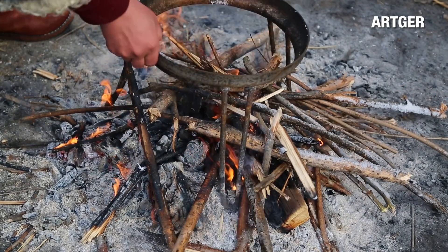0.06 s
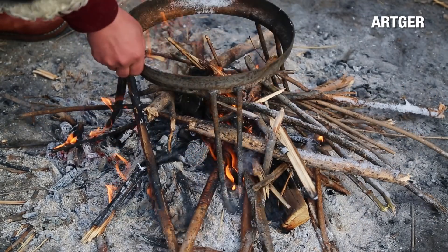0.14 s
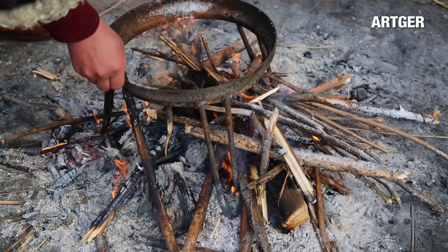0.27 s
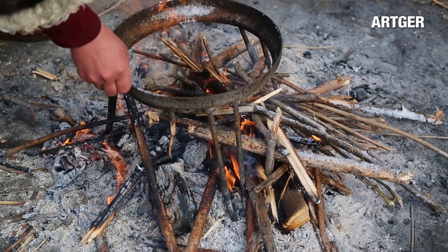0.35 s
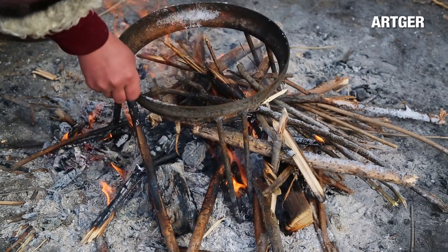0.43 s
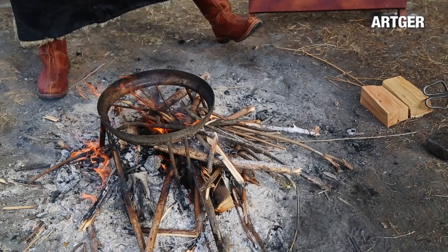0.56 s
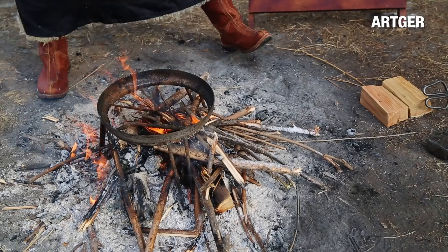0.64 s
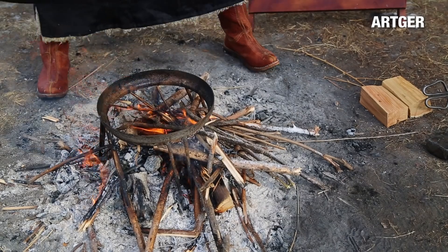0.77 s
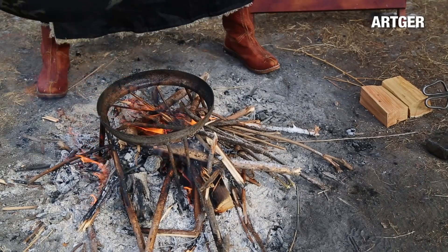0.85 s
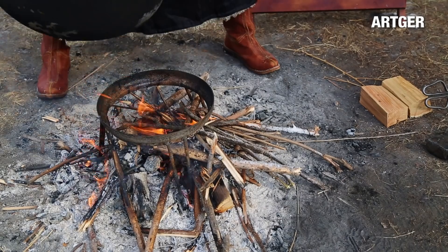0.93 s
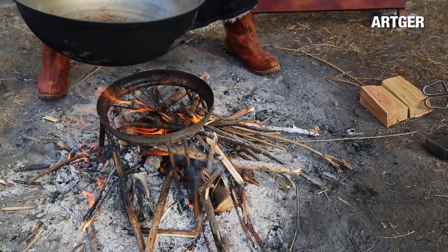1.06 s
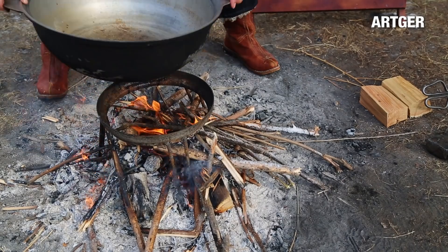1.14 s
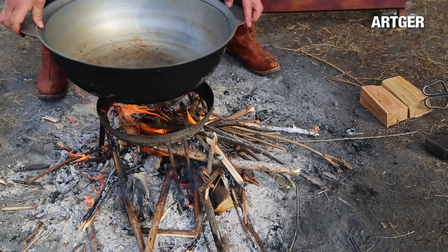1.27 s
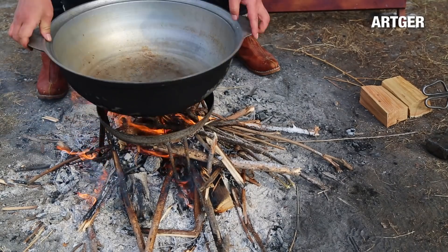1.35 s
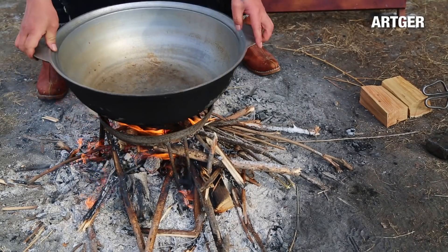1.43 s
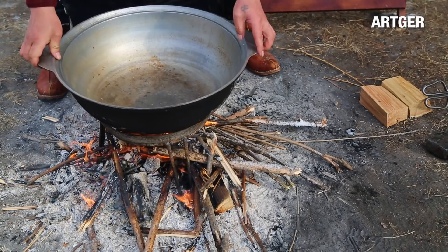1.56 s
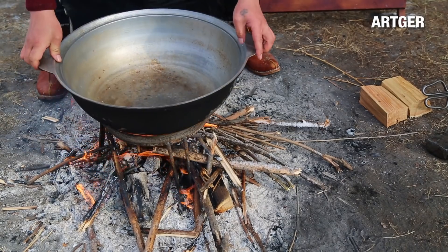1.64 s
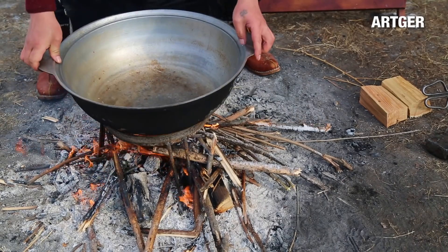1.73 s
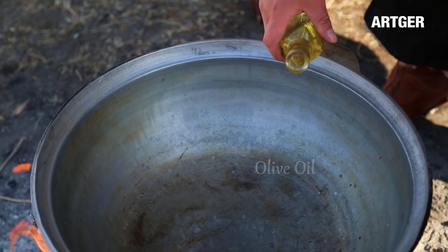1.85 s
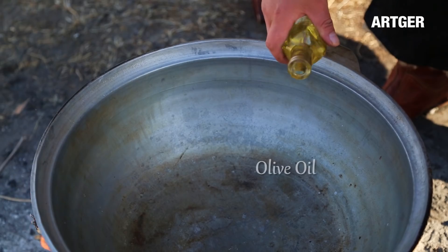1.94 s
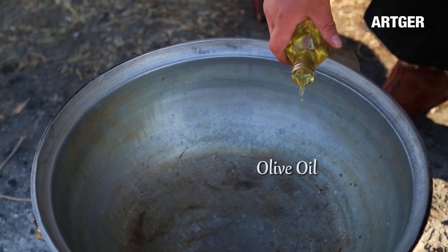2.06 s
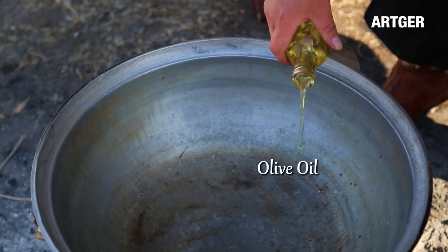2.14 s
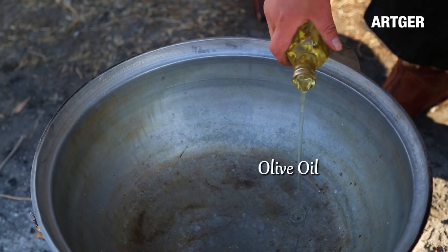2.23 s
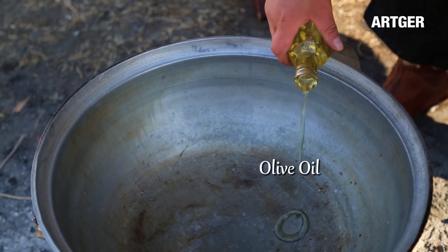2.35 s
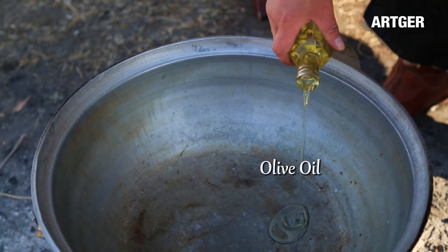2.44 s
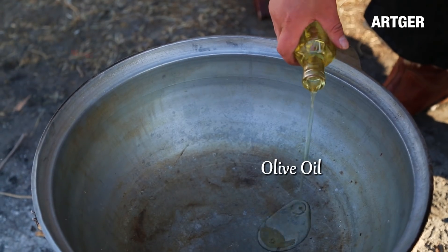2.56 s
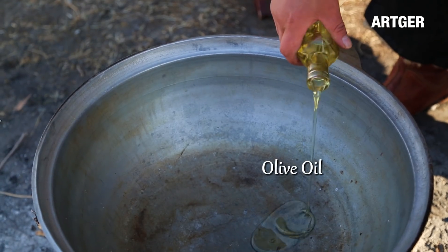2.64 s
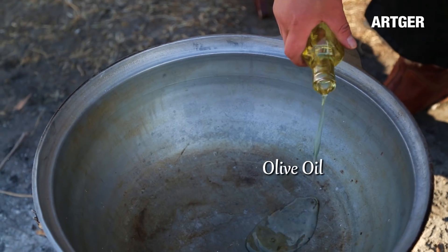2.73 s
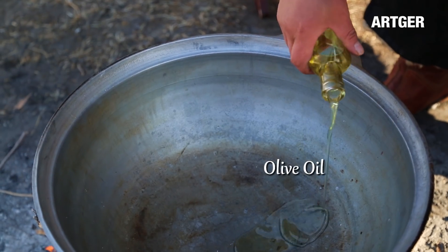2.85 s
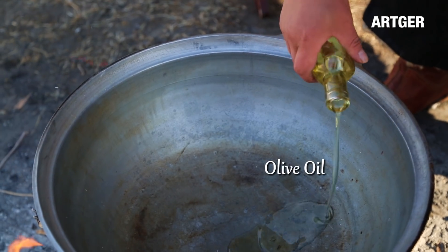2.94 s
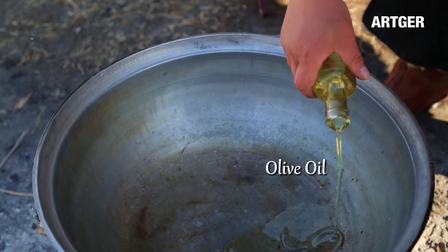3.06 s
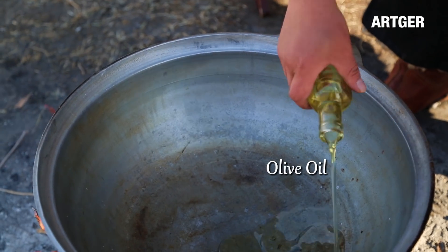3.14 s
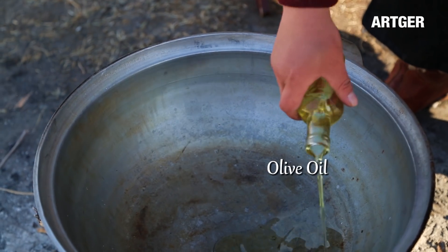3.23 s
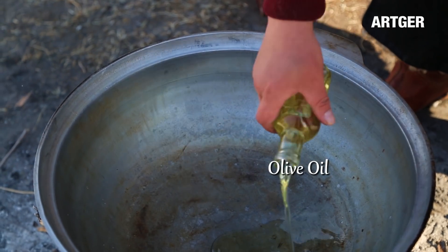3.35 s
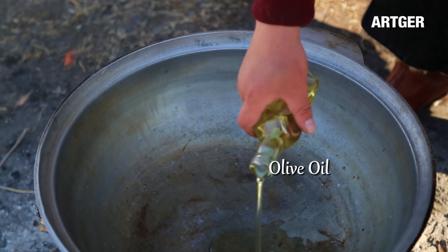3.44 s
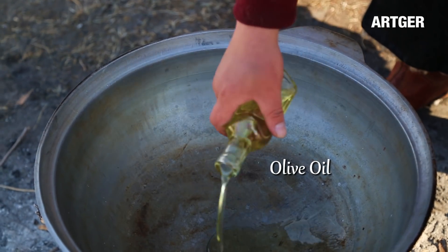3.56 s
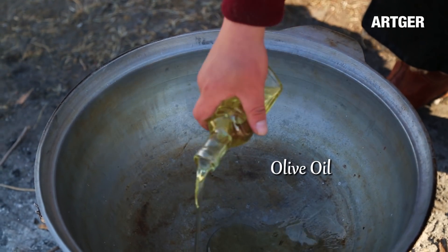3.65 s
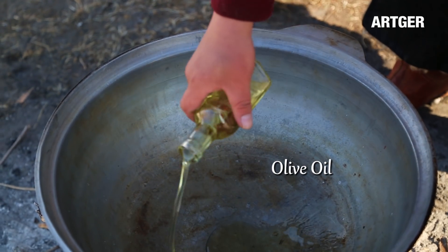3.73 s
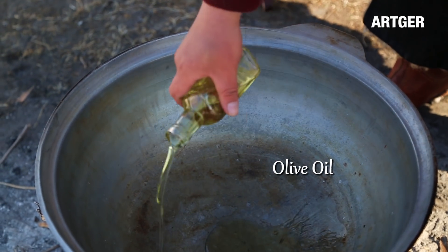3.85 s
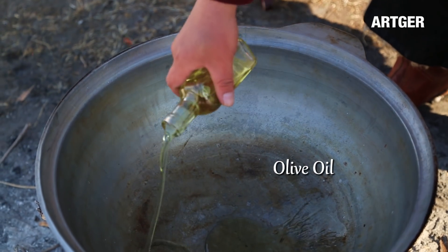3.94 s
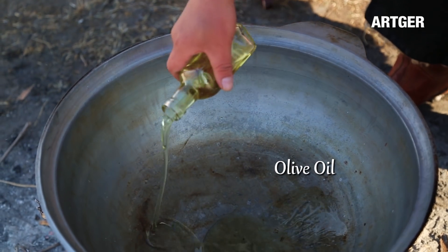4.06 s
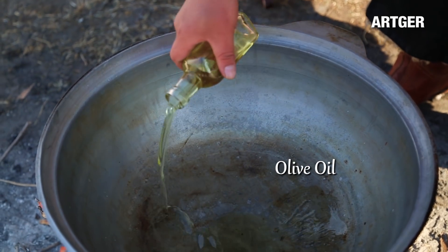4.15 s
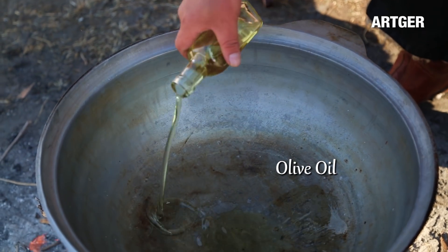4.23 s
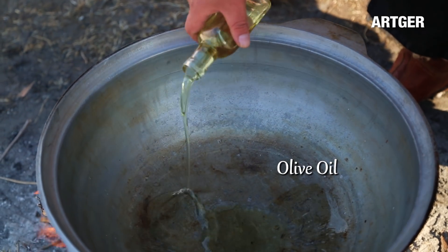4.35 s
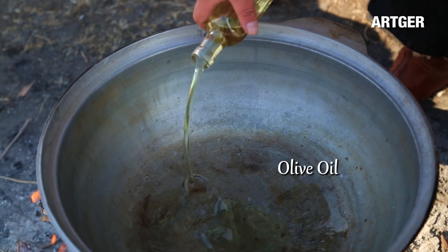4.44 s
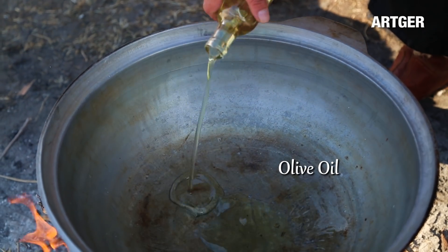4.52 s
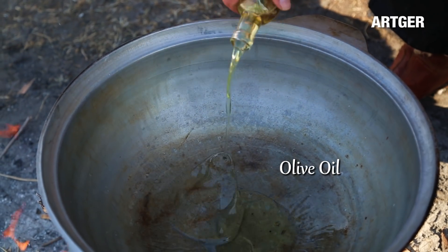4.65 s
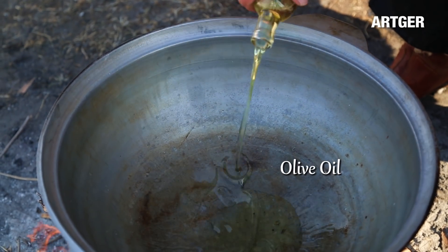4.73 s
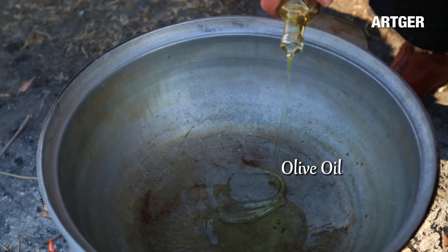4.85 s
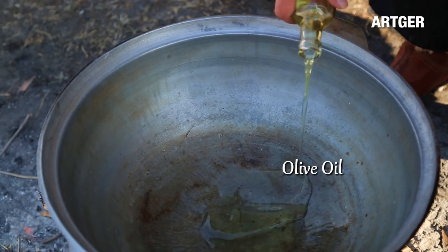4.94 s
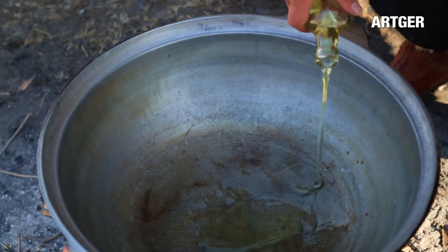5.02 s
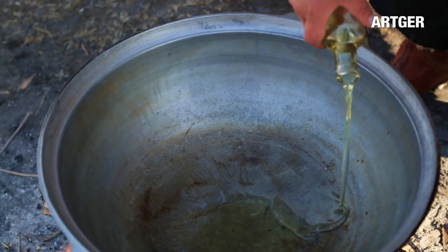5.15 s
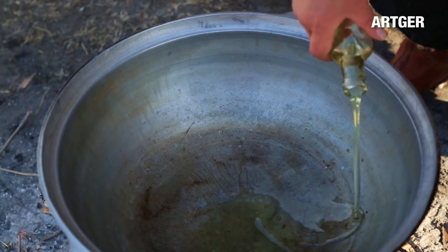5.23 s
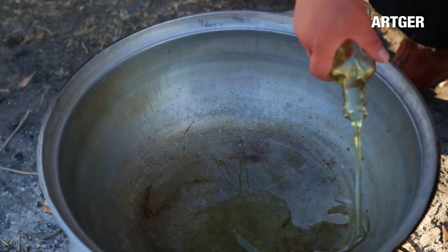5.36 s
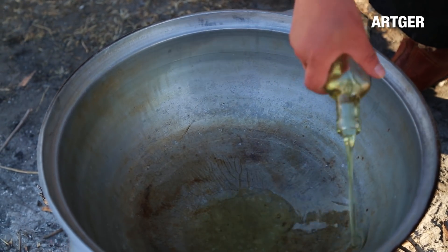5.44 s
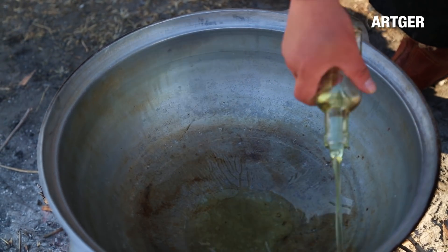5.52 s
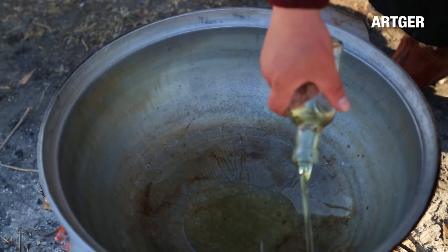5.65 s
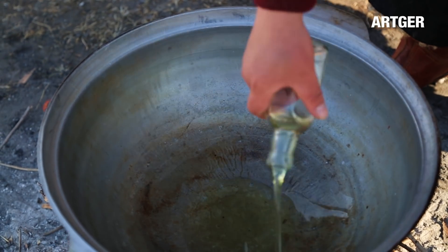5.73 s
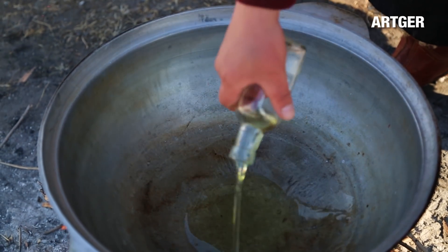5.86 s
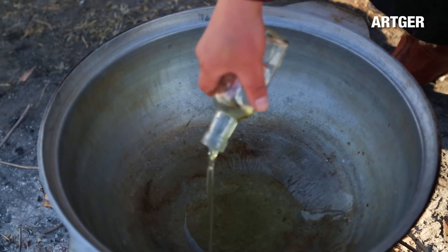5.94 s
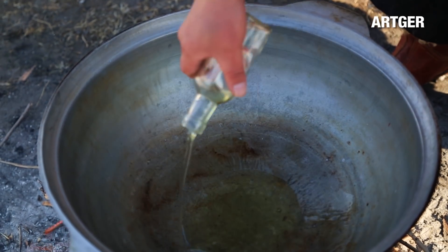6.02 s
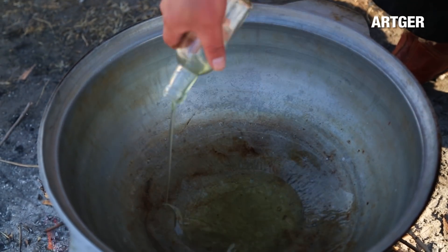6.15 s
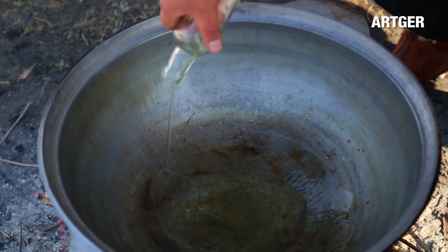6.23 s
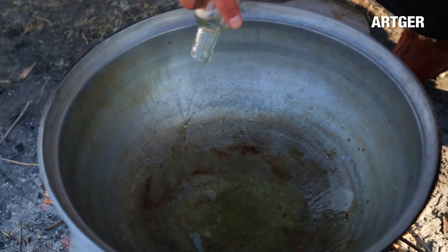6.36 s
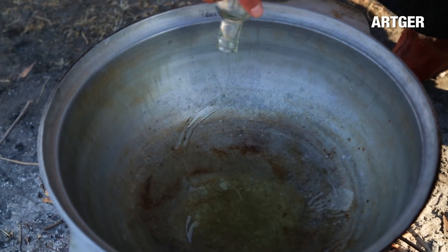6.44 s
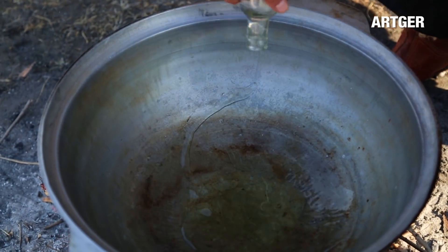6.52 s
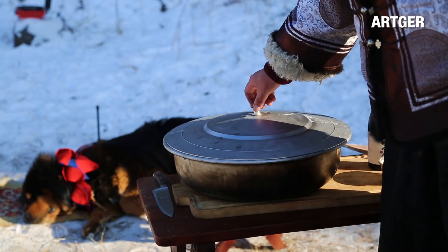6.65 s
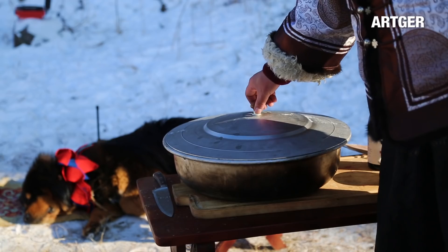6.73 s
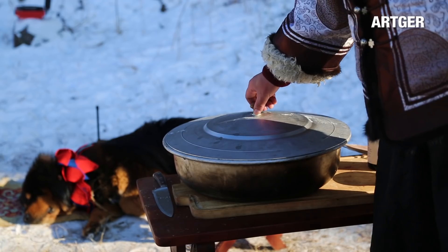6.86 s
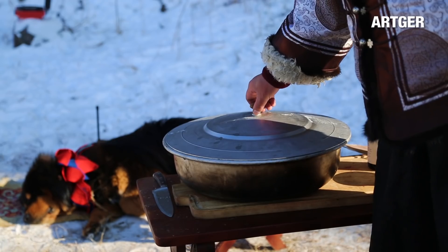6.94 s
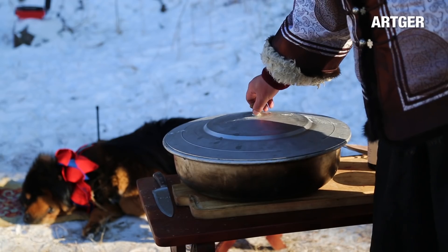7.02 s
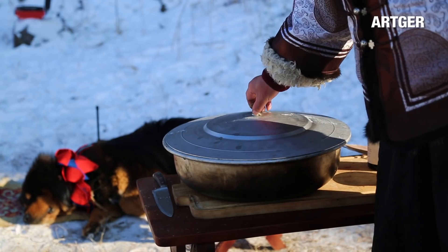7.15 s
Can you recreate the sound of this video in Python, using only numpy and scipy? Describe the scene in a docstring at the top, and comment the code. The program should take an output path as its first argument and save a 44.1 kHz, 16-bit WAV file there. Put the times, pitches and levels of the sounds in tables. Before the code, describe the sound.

Iron scrapes gritty sticks, a pot lands with a short clank, and sharp irregular wood snaps continue over low fluttering flames before turning faint.

```python
"""Twig fire with an iron stand, a pot and oil.

Flames flutter and hiss as shaped noise outdoors, under filtered-pulse snaps, ticks and soft echoes
of some snaps (grainy noise). An iron stand drags over sticks (gritty noise, rod resonances), then a
metal pot rings as it is set down. Low sines thump; gliding sines are oil drips and bottle glugs.
Near the end the microphone is suddenly farther off: flames, hiss and ticks drop.
"""
import sys
import numpy as np
from scipy import signal
from scipy.fft import rfft, irfft
from scipy.io import wavfile
from scipy.ndimage import uniform_filter1d

SR = 44100
rng = np.random.default_rng(int(sys.argv[2]) if len(sys.argv) > 2 else 0)


def unload_wav(signal):
    """Save mono or channel-first audio to the path in sys.argv[1] as 16-bit WAV at rate SR, clipped to [-1, 1]."""
    wavfile.write(
        sys.argv[1],
        SR,
        np.round(np.clip(np.atleast_2d(signal).T, -1, 1) * 32767).astype(np.int16),
    )


N = 316902


def gain_of(db):
    """Decibels to an amplitude factor."""
    return 10 ** (np.asarray(db) / 20)


def evened(x):
    """Scales to rms 1."""
    return x / np.sqrt(np.mean(x ** 2) + 1e-20)


def read(points, hz):
    """Reads a spectrum table on a log-frequency axis."""
    point_hz, value = np.transpose(points)
    return np.interp(np.log(hz + 1), np.log(point_hz + 1), value)


def steps(times_s, values):
    """Straight lines through points in time, sample by sample."""
    return np.interp(np.arange(N) / SR, times_s, values)


def curve(rows, index):
    """One column of a time table, sample by sample."""
    rows = np.array(rows)
    return steps(rows[:, 0], rows[:, index])


def add(mix, start_s, sound):
    """Mixes a sound in at start_s."""
    part = mix[round(start_s * SR):][:len(sound)]
    part += sound[:len(part)]


def noise(spectrum, patchy_db, flicker_db, size, count=9):
    """Random short-time spectra: drifting patches, count bins wide, and a flicker common to all bins."""
    hz = np.fft.rfftfreq(size, 1 / SR)
    real, imag, patches = rng.standard_normal((4 * N // size + 5, len(hz), 3)).T
    flicker = evened(uniform_filter1d(patches[0], size=2))
    patches = uniform_filter1d(patches, size=count, axis=0)
    patches = evened(uniform_filter1d(patches, size=4, axis=1))
    patches = np.clip(patches, -2, 2)
    level_db = read(spectrum, hz)[:, None] + patchy_db * patches + flicker_db * flicker
    frames = (real + 1j * imag) * gain_of(level_db)
    return evened(signal.istft(frames, nperseg=size, noverlap=3 * size // 4)[1][:N])


DIP_S, DIP_DEEPEST_S, DIP_END_S, DIP_DB = 3.53, 3.6, 3.63, -15
DIP_HISS_SHARE = 0.49  # share of DIP_DB
FAR_S, FAR_FADE_S, FAR_DB, FAR_HISS_DB = 6.62, 0.061, -11.5, -6


def roar_db(dip_db, far_db):
    """A brief dip in level; later the step down as the microphone is farther off."""
    dip = steps([DIP_S, DIP_DEEPEST_S, DIP_END_S], [0, dip_db, 0])
    return dip + steps([FAR_S, FAR_S + FAR_FADE_S], [0, far_db])


HISS_NEAR_DB, HISS_DB, HISS_SETTLE_S = -51.5, -59, 1


def hiss_db():
    """Hiss level: strong close to the fire, settling exponentially as the microphone backs off."""
    settle = np.exp(-np.arange(N) / SR / HISS_SETTLE_S)
    return HISS_DB + (HISS_NEAR_DB - HISS_DB) * settle + roar_db(DIP_HISS_SHARE * DIP_DB, FAR_HISS_DB)


# Flame level before dip and distance. Each row: time in seconds, flutter in dB, deep gusts in dB.
FLAMES = [(0, -59, -63), (.24, -48, -60), (.62, -53, -65), (1.08, -52.5, -50.5), (1.9, -48, -55.5),
          (3.05, -47, -58), (3.3, -47, -44), (3.5, -47.5, -57.5), (4.7, -47, -53.5), (5, -46, -49),
          (5.3, -45, -52), (5.75, -44, -50), (6.6, -44, -55), (7.19, -44, -46)]
# Spectra of flutter, gusts and hiss. Each row: frequency in Hz, relative density in dB per Hz.
FLUTTER = [(20, -50), (60, -16), (136, 1.5), (229, -3.5), (341, -21.5), (597, -25.5), (826, -29),
           (1500, -34.5), (2200, -67)]
GUSTS = [(12, -27), (25, 3), (45, 1.5), (90, 12), (200, -35.5)]
HISS = [(240, 0.5), (400, -0.5), (1000, -8), (2400, -9), (7000, -11.5), (13700, -15.5), (15600, -18),
        (16000, -51)]


def flames():
    """Burning gas as three shaped noises: lumpy low flutter, deeper gusts, smooth hiss."""
    flutter = gain_of(curve(FLAMES, index=1)) * noise(FLUTTER, patchy_db=1.5, flicker_db=1.5, size=1024)
    gusts = gain_of(curve(FLAMES, index=2)) * noise(GUSTS, patchy_db=3.5, flicker_db=2.5, size=4096)
    low = (flutter + gusts) * gain_of(roar_db(DIP_DB, FAR_DB))
    hiss = gain_of(hiss_db()) * noise(HISS, patchy_db=2.5, flicker_db=-0.3, size=512)
    return low + hiss


def jerk(length_s):
    """Envelope of a jerk: catches fast, lets go slowly."""
    return np.sin(np.pi * np.linspace(0, 1, round(length_s * SR)) ** 0.52)


SLIDE_DB, SLIDE_END_S, LIFT_S = -50, 0.624, 0.0078  # steady slide under the jerks
BRIGHT_DB, BRIGHT_PER_DB = -3, 0.48  # harder jerks are brighter


def lift():
    """Fades the rubbing out as the slide ends."""
    return steps([SLIDE_END_S - LIFT_S, SLIDE_END_S], [1, 0])


# Jerks of the stand over sticks.
# Each row: start in seconds, length in seconds, level in dB, centre of the rods' response in Hz.
JERKS = [(0, .05, -50.5, 5000), (0.041, 0.07, -40, 7800), (0.099, 0.086, -43.5, 4000),
         (0.242, .11, -52.5, 2620), (0.372, 0.069, -55, 5000), (0.483, 0.056, -49, 5600),
         (0.536, .08, -52, 3800)]
# Spectrum of sticks and ash. Each row: frequency in Hz, relative density in dB per Hz.
RUSTLE = [(180, -41), (320, 1), (2000, -1), (5190, 0), (7760, -2), (14200, -4.5), (15600, -22),
          (16000, -45)]


def drag():
    """Gritty rustle of sticks and ash; the rubbed iron adds many thin, short-lived lines."""
    rustle = noise(RUSTLE, patchy_db=2.5, flicker_db=2, size=256)
    grit = evened(rustle * gain_of(3.5 * rng.standard_normal(N)))
    grit += gain_of(-1.5) * noise(RUSTLE, patchy_db=5, flicker_db=0, size=2048, count=2)
    bright = signal.lfilter(*signal.butter(2, 7000, "high", fs=SR), grit) / grit.std()
    push = np.ones(N)
    for start_s, length_s, db, _ in JERKS:
        add(push, start_s, gain_of(db - SLIDE_DB) * jerk(length_s))
    rub = evened(grit) + (gain_of(BRIGHT_DB) * push ** BRIGHT_PER_DB - 1) * bright
    return gain_of(SLIDE_DB) * push * lift() * rub


# Modes of the stand. Each row: frequency in Hz, bandwidth in Hz, level in dB.
RODS = [(2260, 19, -6), (2830, 42, -8.5), (3610, 43, -10), (4320, 26, -6.5), (5140, 37, -20),
        (5900, 59, -16), (7160, 110, -13), (7800, 490, -1.5), (7700, 60, -23)]
SING_DB, SING_SCATTER_DB = -6.5, 3.5  # rod modes under the steady slide, re SLIDE_DB
REACH_OCTAVES = 0.85


def squeals():
    """Friction noise through rod modes: all wax and wane; each jerk favours modes near its centre."""
    out, span = np.zeros(N), round(SLIDE_END_S * SR)
    rubs, wander = rng.standard_normal((2, len(RODS), span + 4000))
    for (hz, width_hz, mode_db), rub, slow in zip(RODS, rubs, wander):
        scatter_db = SING_SCATTER_DB * evened(uniform_filter1d(slow, size=3000))
        drive = gain_of(SLIDE_DB + SING_DB + scatter_db)[:span]
        for start_s, length_s, db, centre_hz in JERKS:
            favour = np.exp(-(np.log2(hz / centre_hz) / REACH_OCTAVES) ** 2)
            add(drive, start_s, favour * gain_of(db) * jerk(length_s))
        ring = signal.lfilter(*signal.iirpeak(hz, hz / width_hz, SR), rub)[4000:]  # skips the onset
        out[:span] += gain_of(mode_db) * drive * evened(ring)
    return out * lift()


# Colour of an average snap. Each row: frequency in Hz, level in dB.
CRACK = [(60, -17), (250, -5), (1400, 1), (2600, 0.5), (4300, 2.5), (5800, 0), (7000, 0), (7800, -2.5),
         (11000, -8), (14000, -10.5), (16000, -13.5)]


def crack(bass_db, treble_db):
    """A causal (minimum-phase) pressure pulse of peak 1, going negative first."""
    hz = np.fft.rfftfreq(1024, 1 / SR)
    tilt_db = read([(350, bass_db - 3.5), (900, bass_db), (2500, 0), (4500, 0), (9000, treble_db)], hz)
    cepstrum = irfft(np.log(gain_of(read(CRACK, hz) + tilt_db)))
    # folding the cepstrum makes the phase minimum
    cepstrum[1:512] *= 2
    cepstrum[513:] = 0
    pulse = irfft(np.exp(rfft(cepstrum)))[:512]
    return -pulse / abs(pulse).max()


BOUNCE_S, BOUNCE_SPREAD_S, BOUNCE_DB = .004, .0004, -13  # ground reflection


def snap(bass_db, treble_db, splinter_db, chance):
    """A crack, its ground bounce, and a dying spray of splinters and reflections off nearby sticks."""
    t = np.arange(chance.shape[1]) / SR
    decay = gain_of(-60 * t / 0.007) + gain_of(-12 - 60 * t / 0.03) + gain_of(-32 - 60 * t / 0.09)
    spray = chance[0] * gain_of(4.0 * chance[1]) * decay
    spray = spray * (t > .00012)
    spray *= gain_of(splinter_db) / np.linalg.norm(spray)
    spray[0] = 1
    bounce_s = BOUNCE_S + BOUNCE_SPREAD_S * chance[0, 0]
    spray[round(bounce_s * SR)] += gain_of(BOUNCE_DB)
    return signal.fftconvolve(spray, crack(bass_db, treble_db))


# Pockets of sap bursting. Each row: time in seconds, peak of the crack in dB, bass in dB,
# treble in dB, splinters in dB re the crack.
SNAPS = [(0.4396, -14, 0, 13, -2), (0.452, -22, -2, 4, -8), (0.548, -29.5, 14, -2, 8),
         (0.6988, -33, -14, 5, -2), (0.8573, -28.5, -4, 7, -12), (0.9362, -23.5, 5, 6, 2.5),
         (0.9358, -8, -28, 9.5, -4.5), (1.107, -32.5, -13, 12, 4), (1.1538, -30, -10, 1, -8),
         (1.2438, -33.5, -11, 30, 1), (1.3338, -35.5, -12, -2, -14), (1.5074, -21, 2.5, 6.5, 2.5),
         (1.5856, -34.5, -20, 6.5, 8.5), (1.649, -27, 0, 8, -8), (1.6707, -29, -13, -1, 2),
         (1.8321, -22.5, -18, 13, 1), (1.8586, -31, 8, 12, -11), (1.9383, 3.5, 3.5, 5, 1),
         (1.9722, -20.5, 11.5, 10.5, 4), (2.07, -37, 10, 3, 6), (2.1383, -4.5, 5.5, -7, -3.5),
         (2.3986, -10, 15, 7, -7.5), (2.433, -20, 12, 7.5, 1.5), (2.5565, -6.5, 1, 9.5, -11),
         (2.5652, -24.5, 6, -2, -7), (2.6501, -24, 14, -7, 10), (2.653, -13.5, -6, -42, -2.5),
         (2.6686, -24, 17, 11, -6), (2.7776, -33, 7, 1.5, 5.5), (3.082, -20, 7.5, 4, -6),
         (3.1745, -11, 10, -1, -4), (3.1769, -10.5, -17.5, -8.5, -2.5), (3.3732, -35, 12, -8, -1),
         (3.3787, -25.5, 15.5, 5.5, -2), (3.403, -24.5, 1.5, 6, -7), (3.4807, -26.5, -9, 15, -11),
         (3.5351, -9.5, 0.5, 5.5, -4.5), (3.566, -5.5, 3, 4.5, 4), (3.7026, -19, 1, 10, -7),
         (3.7125, -20, 4, 10, -10), (3.7465, -15, 4, 9, -10), (3.791, -20.5, 7, -1, -11),
         (3.817, -25, 7, 8, -7), (3.8245, -22.5, 10, 2, -7), (3.877, -28.5, 9, 7, -7),
         (3.9965, -30, 12, -26, -14), (4.0772, -25.5, -5, 7, -6), (4.3403, -31, -1, 5, 1.5),
         (4.536, -29, 7, -4, -0.5), (4.5493, -25, 10, 4, 1), (4.5911, -14, 4, 8, -4),
         (4.6051, -16.5, 7.5, 5.5, -4.5), (4.6608, -30.5, 8, -11, -3), (4.6692, -20, 2, 9, 1.5),
         (4.7313, -14, 4, 6.5, -6), (4.972, -8, -1.5, 9, -1.5), (5.3286, -16.5, 13, 2, 6.5),
         (5.35, -30, -13, -5, -2), (5.3534, -16, 8.5, -3, -5), (5.4955, -2, 5.5, 10.5, 3.5),
         (5.6477, -20.5, 14.5, 2, -10), (5.7365, -11.5, -1, 12, -8), (5.8341, -19, 3, 4, -13),
         (5.9236, -19.5, 7, 3, -7), (5.9355, -19.5, 7, 3.5, -8), (6.012, -21, 4, 2, -7),
         (6.1359, -23, -7, 3, -11), (6.3044, -28.5, 0, 1, -8), (6.339, -14.5, -2, 7.5, -4),
         (6.4251, -1, 10.5, 6, -0.5), (6.4282, 0, 8, 13.5, -7), (6.431, -11, 9, -8, -15),
         (6.4915, -12.5, -2, 12, -12), (6.5671, -16, 11.5, 4, -5.5), (6.7149, -36.5, -14, 13, 0),
         (6.7599, -38, -16, 11, -10), (6.8002, -27, 2, 6, -10), (7.1047, -35, 2, 3, -4)]
TICK_DB, TICK_SPREAD_DB, TICKS_PER_S = 16, 3.1, 14  # TICK_DB is re the hiss level


def snaps():
    """Distinct bursts over a random scatter of faint ticks in four colours."""
    out = np.zeros(N)
    chance = rng.standard_normal((len(SNAPS), 2, 2600))
    for (peak_s, db, *shape), row in zip(SNAPS, chance):
        add(out, peak_s - .00008, gain_of(db) * snap(*shape, row))
    spread_db = TICK_SPREAD_DB * np.minimum(rng.exponential(1, N), 3)
    size = gain_of(hiss_db() + TICK_DB + spread_db)
    kind = np.where(rng.random(N) < TICKS_PER_S / SR, rng.integers(0, 4, N), -1)  # -1: no tick
    for k, (bass_db, treble_db) in enumerate([(13, -17), (-7, 8.0), (-2, 19), (-15, 23)]):
        tick = snap(bass_db, treble_db, -18, rng.standard_normal((2, 800)))
        out += signal.oaconvolve(size * (kind == k), tick)[:N]
    return out


# Dull bumps of feet and wood, and buffets of hot air.
# Each row: start in seconds, envelope peak in dB, frequency in Hz, decay constant t60 in seconds.
THUMPS = [(0.718, -29, 190, 0.018), (1.14, -40.5, 390, 0.021), (1.3, -36.5, 250, 0.0047),
          (1.867, -37, 242, 0.017), (.158, -32, 815, 0.0029), (3.25, -42, 59.5, 0.25),
          (4.974, -31.5, 86, 0.087), (5.188, -36, 79, 0.05), (5.541, -44, 53.6, 0.077),
          (5.735, -40, 63, 0.16)]


def thumps():
    """Decaying low sines with a soft onset."""
    out, t = np.zeros(N), np.arange(6000) / SR
    for start_s, db, hz, t60_s in THUMPS:
        shape = t / t60_s * gain_of(-60 * t / t60_s)
        add(out, start_s, gain_of(db) * shape / shape.max() * np.sin(2 * np.pi * hz * t))
    return out


# Modes of the pot. Each row: frequency in Hz, level in dB, t60 in seconds.
POT = [(285, -0.5, 0.053), (440, -17.5, 0.094), (728, -11.5, 0.075), (1370, -18.5, 0.056),
       (1730, -17, 0.058), (2686, -10, .1), (2850, -11, .08), (3015, -3, .11), (3150, -6, .08),
       (3365, -3, .08), (3661, 0, .085), (4037, -13, .1), (4330, -5, .075), (4735, -9, .08),
       (4996, -6, .11), (5114, -5, .08), (5340, -4, .08), (5700, -3, 0.057), (6000, -1.5, 0.076),
       (6920, -11, 0.0815), (6530, -9, 0.054), (7150, -6.5, 0.084), (7600, -13, .05), (8350, -13, 0.058),
       (8930, -18, .09), (9880, -3.5, 0.066), (10580, -10, 0.097), (12230, -15, 0.094), (13230, -30, 0.088),
       (15300, -20, .06)]
# Contacts of pot and stand. Each row: start in seconds, level in dB, hardness as a cutoff in Hz,
# rise in seconds, ring time as a factor on t60 (at most 1).
KNOCKS = [(1.542, -47, 3300, 0.0035, 0.96), (1.6933, -19.5, 14300, 0.0046, 1),
          (1.712, -26, 7000, 0.012, 0.7), (1.743, -35, 6000, 0.014, 0.75), (1.775, -34, 5000, 0.021, 0.71),
          (2.345, -48, 4200, 0.0033, .45)]


def pot():
    """Each contact swells briefly and rings the same modes; soft contacts miss the high ones."""
    out, t = np.zeros(N), np.arange(9000) / SR
    hz, mode_db, t60_s = np.transpose(POT)[:, :, None]
    chance = rng.standard_normal((len(KNOCKS), len(POT) + 1, len(t)))
    phases = rng.random((len(KNOCKS), len(POT), 1))
    for knock, (fuzz, *wobble), phase in zip(KNOCKS, chance, phases):
        start_s, db, hard_hz, rise_s, ring_time = knock
        # the pot keeps rocking on the stand, so every mode is driven and damped unevenly
        uneven = 1 + .6 * evened(uniform_filter1d(np.array(wobble), size=250, axis=1))
        decay = gain_of(mode_db - 60 * t / (t60_s * min(ring_time, 1)))
        modes = decay * np.sin(2 * np.pi * (hz * t + phase))
        ring = (uneven * modes / (1 + (hz / hard_hz) ** 4)).sum(0)
        # the many weak modes of the wall blur into a noisy ring
        blur = fuzz * (gain_of(6.0 - 60 * t / 0.06) + gain_of(-18.5 - 60 * t / 0.47))
        band_hz = [2600, min(0.67 * hard_hz + 1500, 16000)]
        blur = signal.sosfilt(signal.butter(2, band_hz, "band", fs=SR, output="sos"), blur)
        rise = np.sin(np.pi / 2 * np.minimum(t / rise_s, 1)) ** 2
        add(out, start_s, gain_of(db) * (ring + blur) * rise)
    return out


# Soft diffuse puffs, most about 45 ms after a snap like a distant reflection; the one at 3.867 s sits among the
# bottle glugs. # Each row: start in seconds, level in dB, top of the band in Hz.
ECHOES = [(1.987, -55.5, 8000), (2.682, -57, 4500), (3.217, -51, 8850), (3.614, -51, 9800),
          (3.867, -55.5, 3970), (5.539, -52, 14000), (6.47, -48, 12000)]
ECHO_S, ECHO_LOW_HZ = 0.054, 950  # ECHO_S scales the envelope


def echoes():
    """Grainy band noise that swells quickly and dies."""
    out, u = np.zeros(N), np.arange(8000) / SR / ECHO_S
    shape = np.minimum(u / 0.074, 1) * np.exp(-(1.5 * u) ** 2)
    chance = rng.standard_normal((len(ECHOES), 2, 8000))
    for (start_s, db, top_hz), (hiss, grains) in zip(ECHOES, chance):
        band = signal.butter(1, [ECHO_LOW_HZ, top_hz], "band", fs=SR)
        grain = signal.lfilter(*band, hiss * gain_of(7.4 * grains))
        add(out, start_s, gain_of(db) * evened(grain) * shape)
    return out


# Oil drips into the pot. Each row: start in seconds, peak in dB.
DRIPS = [(2.31, -53), (2.503, -50), (3.063, -46), (3.238, -44.5), (3.424, -51.5)]
DRIP_HZ, DRIP_END_HZ, DRIP_S = 2650, 2760, 0.0087
# Glugs in the bottle.
# Each row: start in seconds, peak in dB, start pitch in Hz, end pitch in Hz, length in seconds.
GLUGS = [(3.763, -51, 1230, 1500, 0.038), (3.782, -49, 1570, 1370, 0.028),
         (3.878, -51.5, 1275, 1650, 0.038)]


def bubbles():
    """Short soft sines whose pitch slides as the bubble changes size and depth."""
    out = np.zeros(N)
    drips = [(*drip, DRIP_HZ, DRIP_END_HZ, DRIP_S) for drip in DRIPS]
    for start_s, db, start_hz, end_hz, length_s in drips + GLUGS:
        hz = np.linspace(start_hz, end_hz, round(length_s * SR))
        tone = np.sin(2 * np.pi * np.cumsum(hz) / SR)
        add(out, start_s, gain_of(db) * np.hanning(len(hz)) * tone)
    return out


def scene():
    """Sum of all sources, one channel."""
    fire = snaps() + echoes() + flames()
    stand = drag() + squeals()
    return (fire + stand + pot() + thumps() + bubbles())[None]


EDGE_HZ = 16100


def record(dry):
    """The converter overloads on the loudest cracks; then a low-pass limits the band."""
    clipped = np.clip(dry, -.92, .92)
    lowpass = signal.firwin(255, EDGE_HZ, window=("kaiser", 9), fs=SR)
    return signal.oaconvolve(clipped, lowpass[None], "same")


dry = scene()
out = record(dry)
unload_wav(out)
```